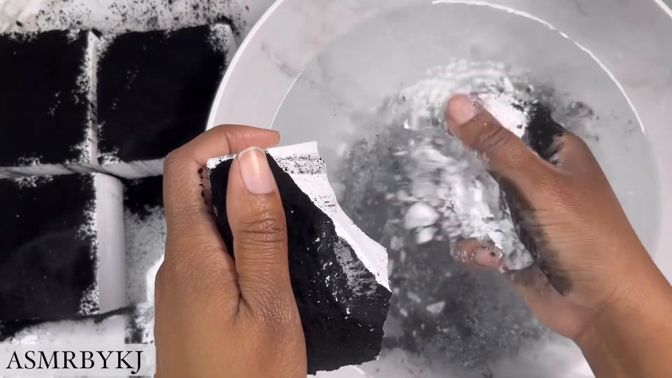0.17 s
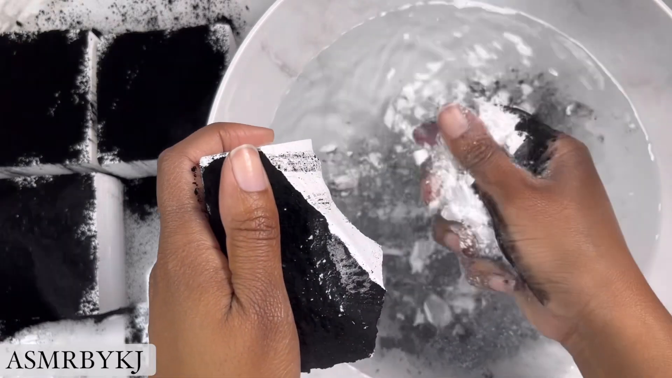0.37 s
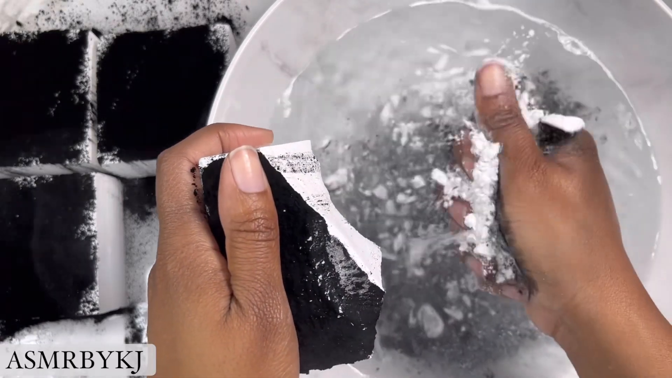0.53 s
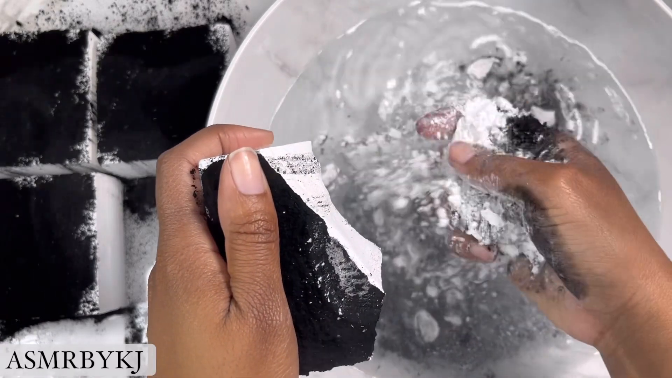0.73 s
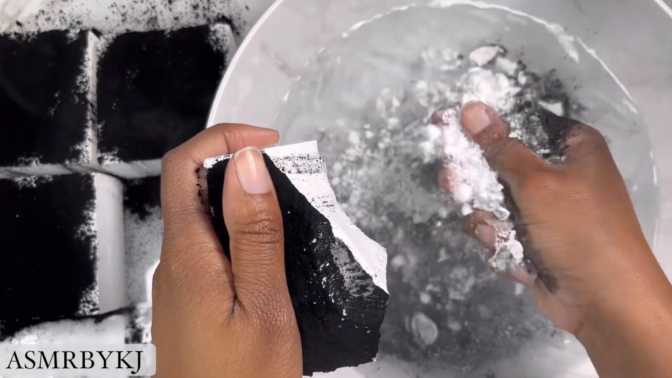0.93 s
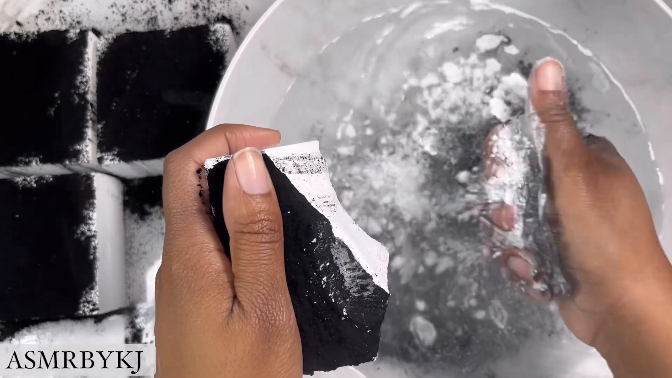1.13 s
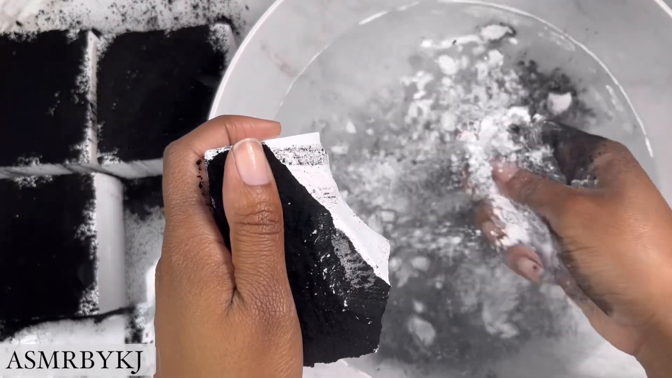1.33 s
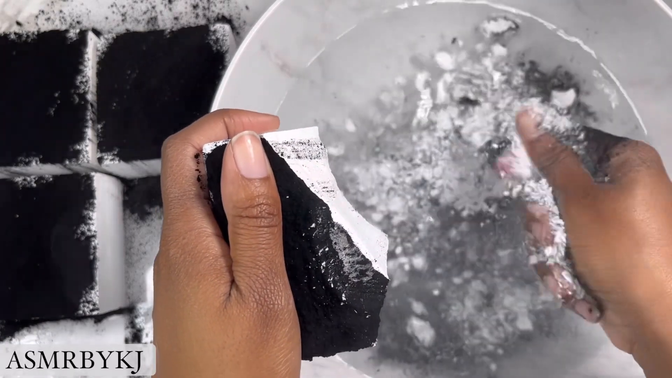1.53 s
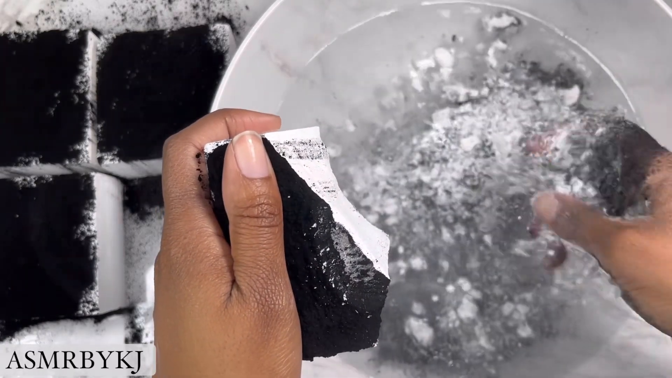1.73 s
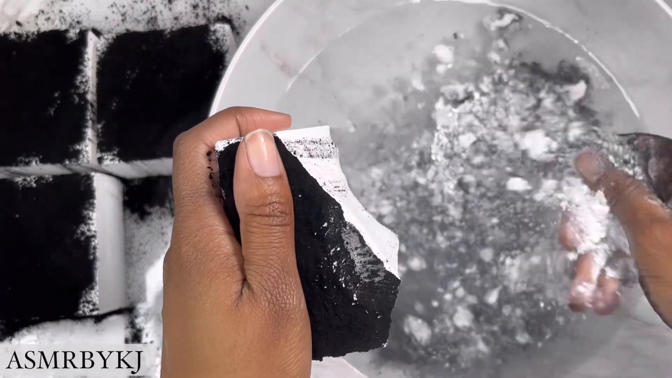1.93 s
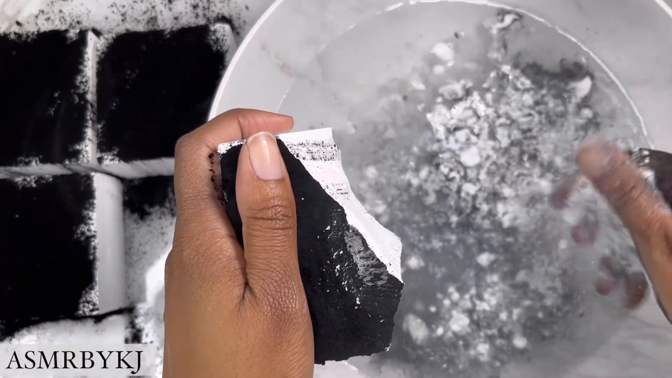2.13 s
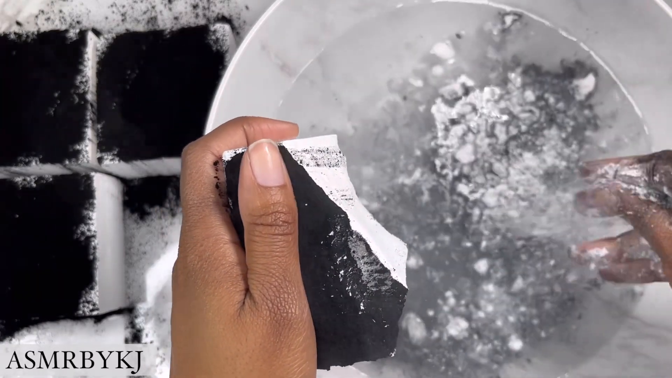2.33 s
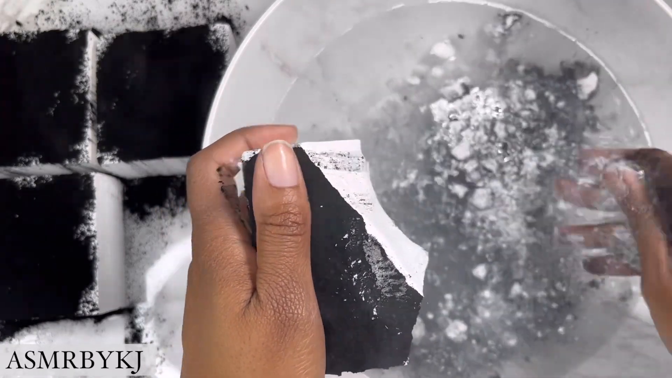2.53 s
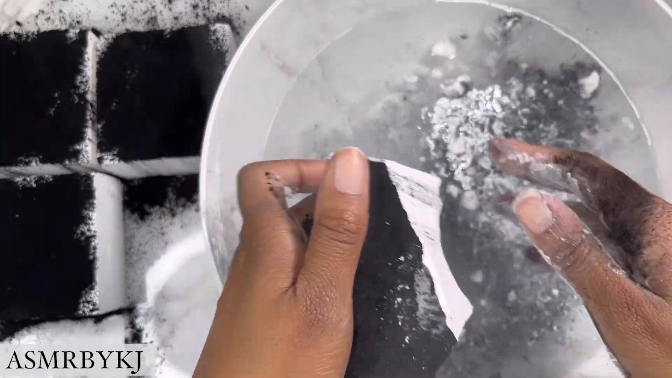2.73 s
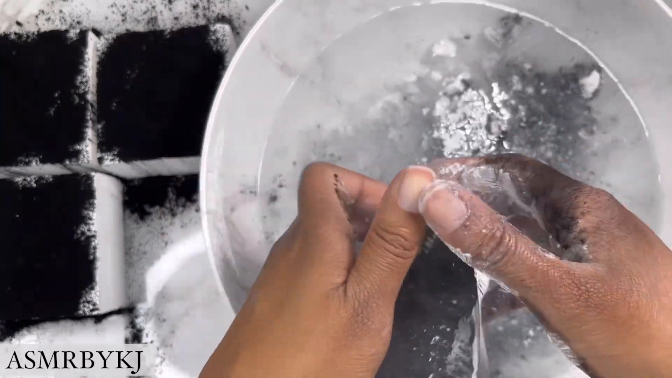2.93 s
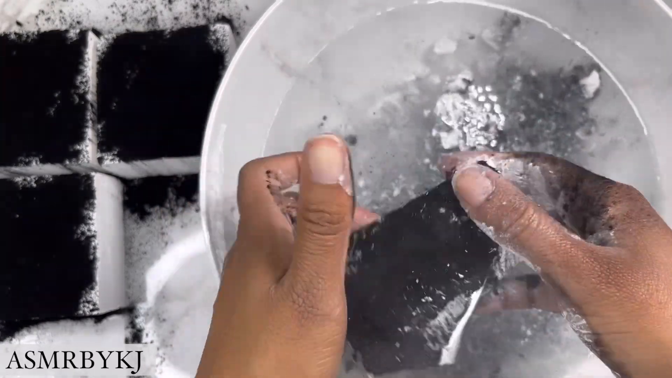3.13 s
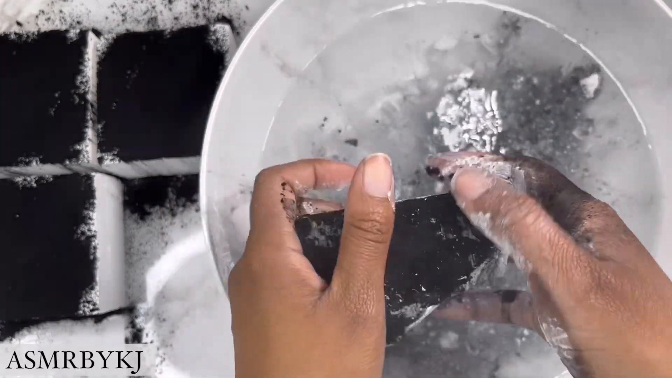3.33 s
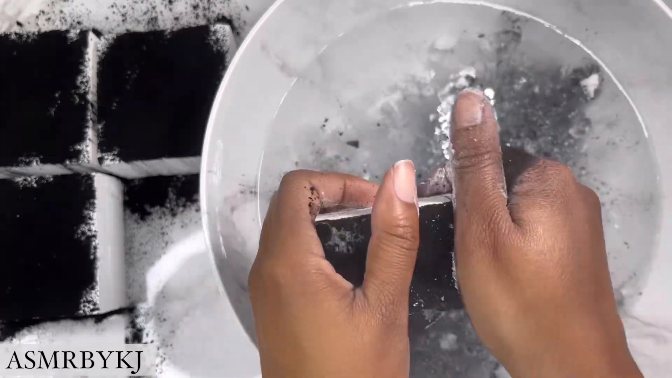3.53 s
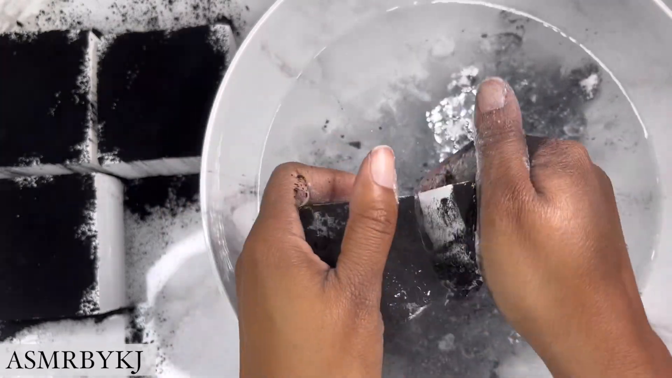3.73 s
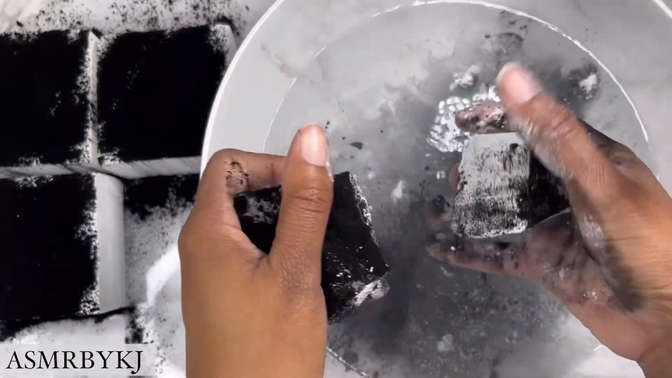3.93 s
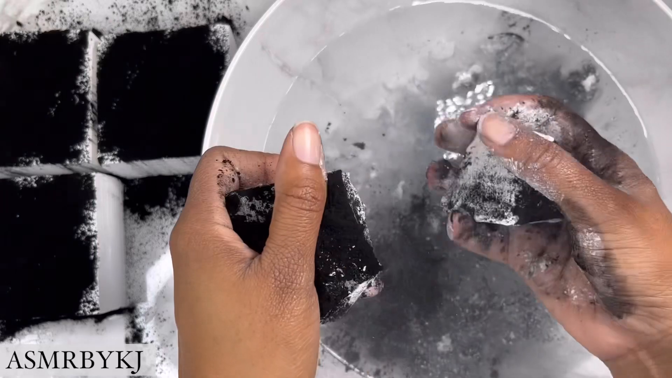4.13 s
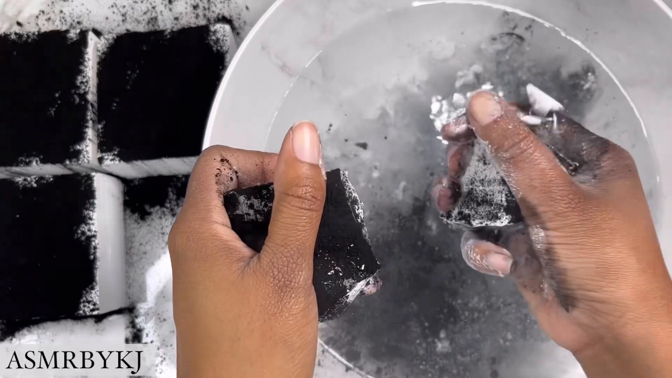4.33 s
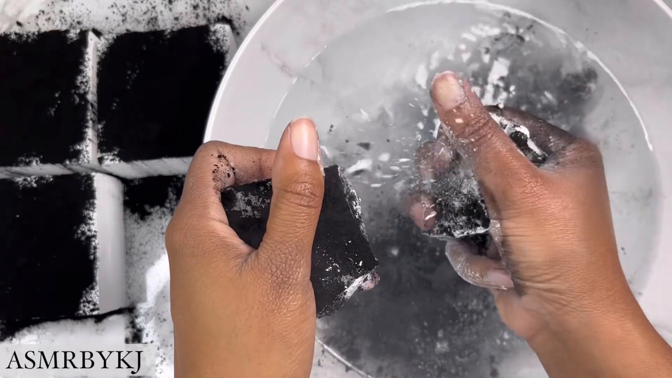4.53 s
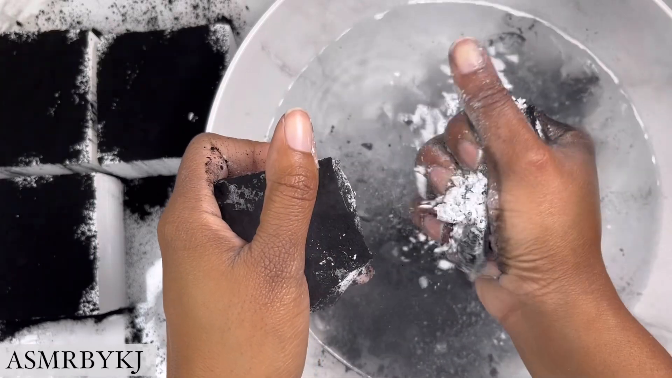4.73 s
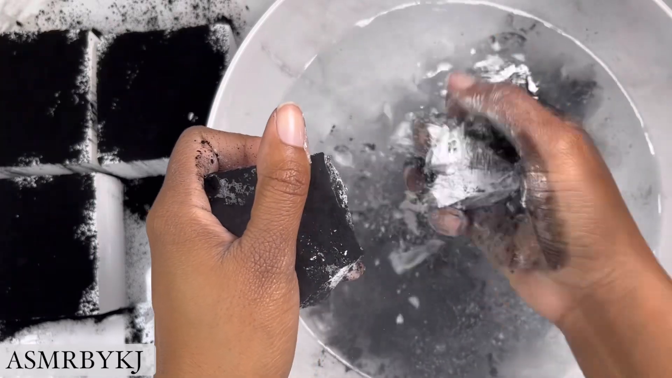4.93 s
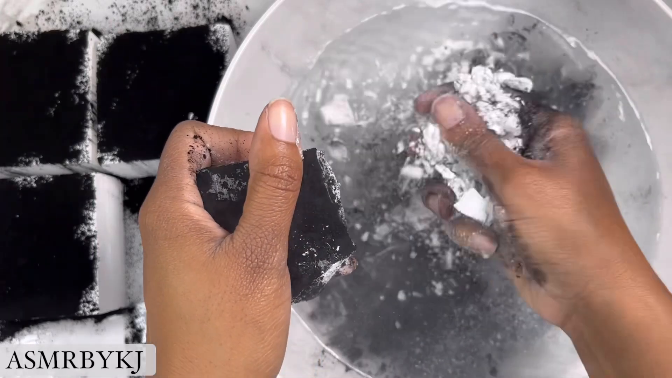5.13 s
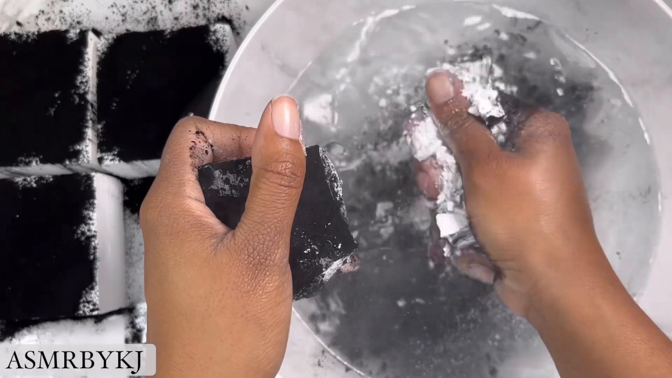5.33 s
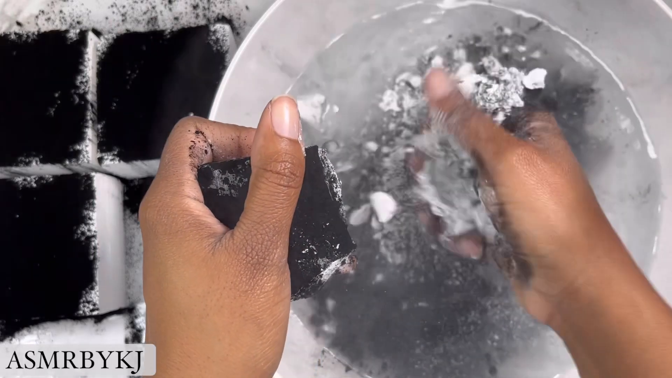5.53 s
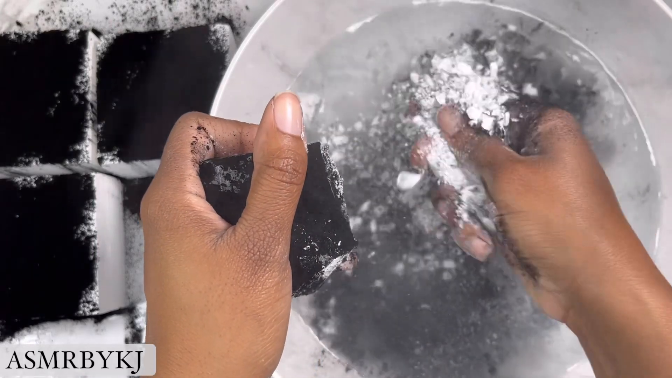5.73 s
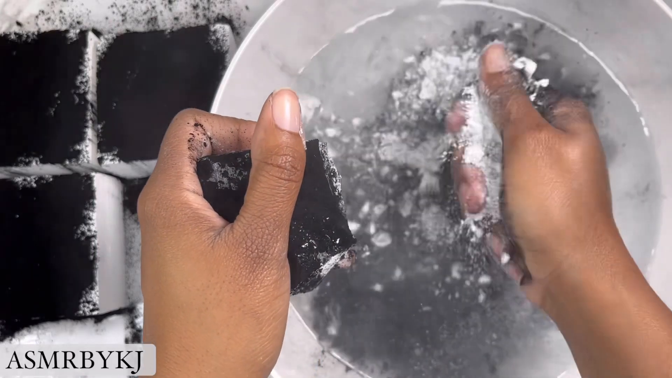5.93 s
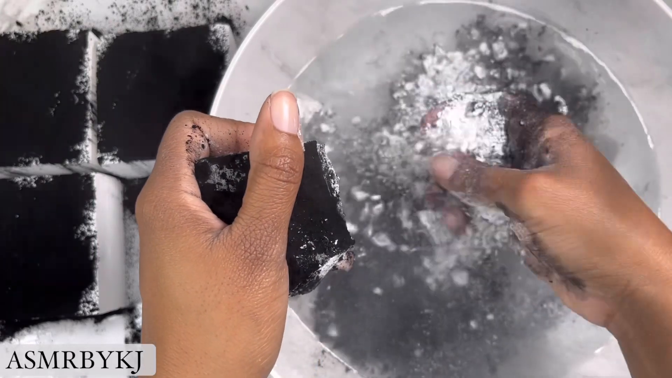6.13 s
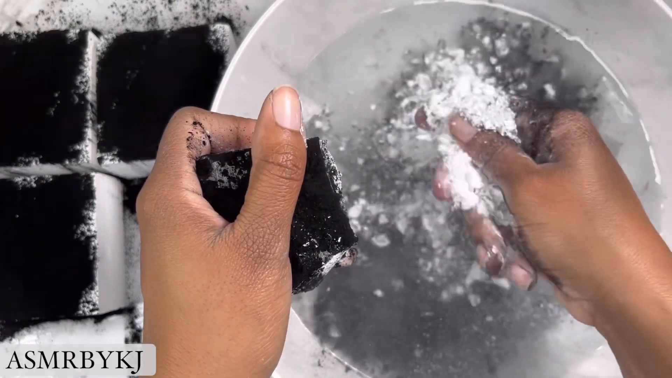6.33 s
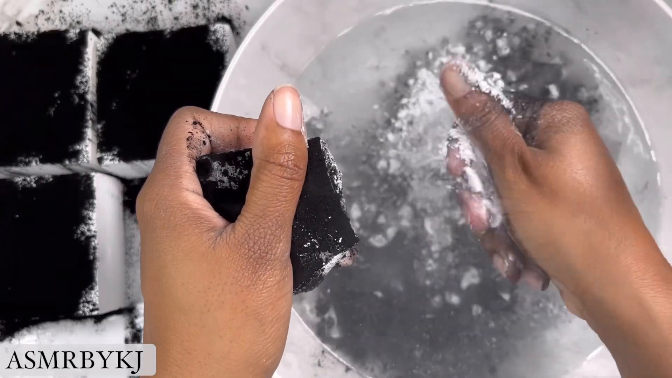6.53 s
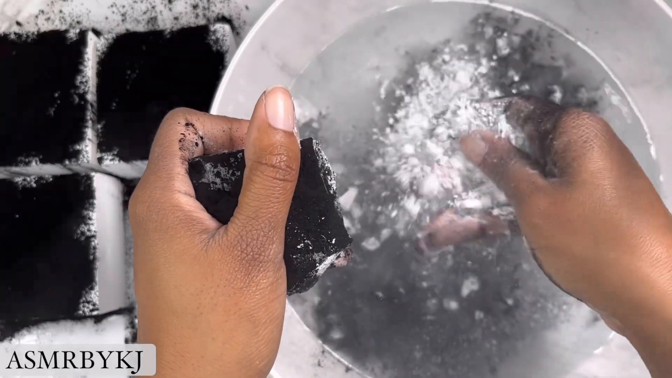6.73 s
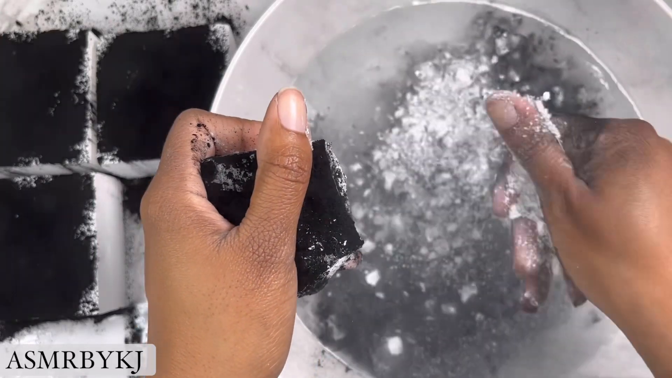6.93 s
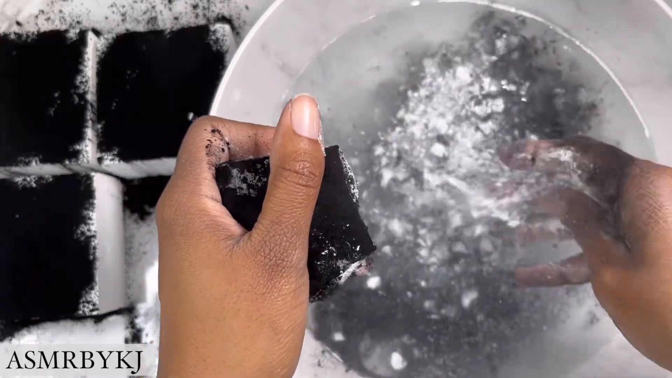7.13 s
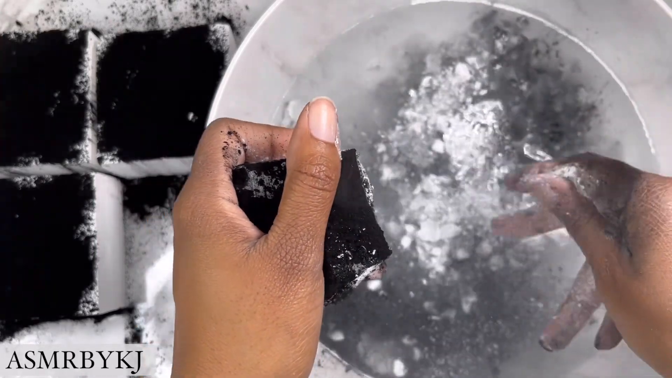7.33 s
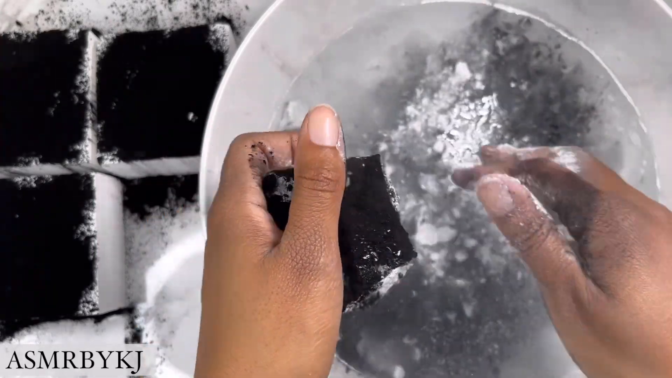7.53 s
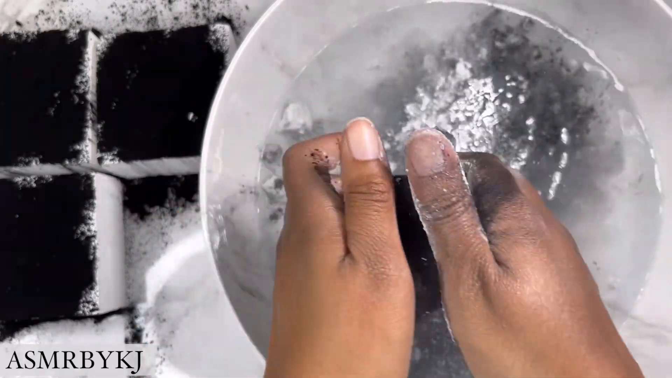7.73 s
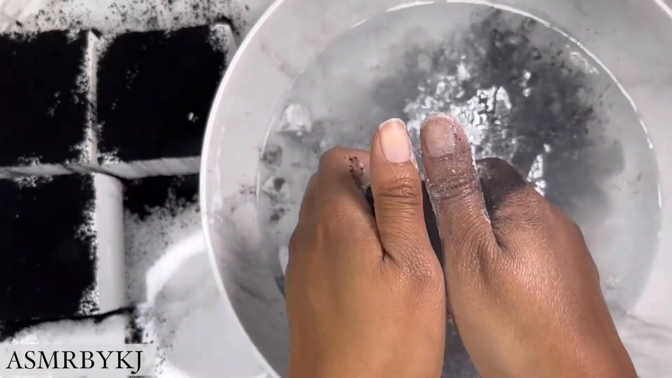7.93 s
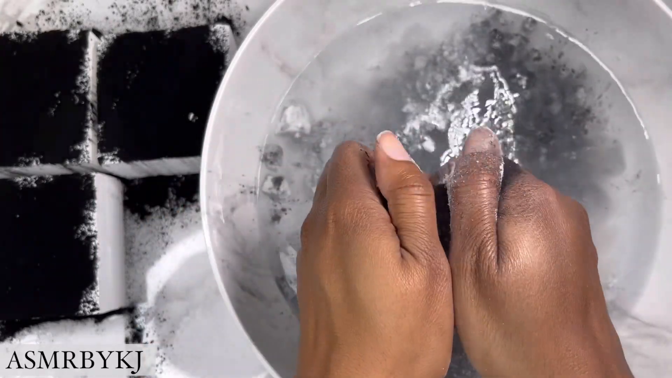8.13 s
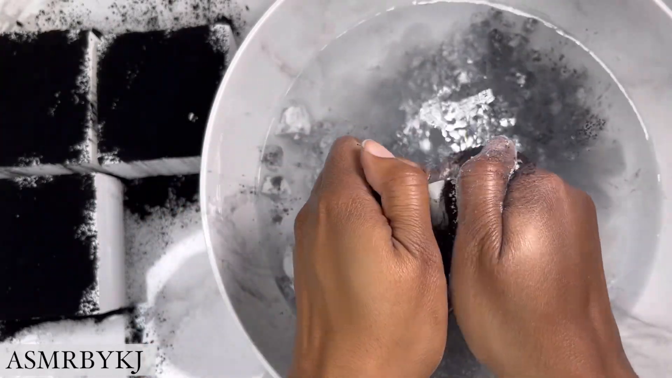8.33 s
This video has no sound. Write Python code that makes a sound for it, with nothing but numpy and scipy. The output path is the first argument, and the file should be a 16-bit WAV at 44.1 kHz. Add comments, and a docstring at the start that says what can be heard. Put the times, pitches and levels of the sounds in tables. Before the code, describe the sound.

Very close to the microphone, fingers crush chalk over a bowl of water with crackling, grinding crumbs and wet fizz. It softens into slippery rubbing, then a block snaps dully. A dense run of loud cracks and crunching follows, thinning to fine crumbling before one last sharp snap. A quiet room rumbles and hums underneath.

```python
"""In a softly rumbling room, hands close to the microphone snap soft chalk and crush it over a bowl of water.
Cracks are short bursts of filtered noise, and two big snaps add a pull and push of air with a dull ring.
Random clicks make grinding crumbs, ticking splinters and fizz; gliding narrow noise makes the squeaks
of air and wet paste. Underneath lie noise for the rumble and wavering tones for a low hum."""
import sys
import numpy as np
from scipy import signal
from scipy.fft import rfft, irfft
from scipy.io import wavfile

SR = 44100
rng = np.random.default_rng(int(sys.argv[2]) if len(sys.argv) > 2 else 0)


def bounce(signal):
    """Save signal as a 16-bit WAV file at the path given by the first command-line argument."""
    frames = np.transpose(np.atleast_2d(signal))
    limited = np.clip(frames, -1, 1)
    pcm = np.round(limited * 32767).astype(np.int16)
    wavfile.write(sys.argv[1], SR, pcm)


N = 369116   # length in samples


def from_db(db):
    """Turn a level in dB into a gain."""
    return 10 ** (np.asarray(db) / 20)


def rms_one(x):
    """Scale a sound so its average strength (rms) is 1."""
    return x / np.sqrt(np.mean(x ** 2) + 1e-20)


def in_time(rows):
    """Draw straight lines between the rows of a table, giving a value for every sample."""
    seconds, *columns = np.transpose(rows)
    return [np.interp(np.arange(N) / SR, seconds, column) for column in columns]


def band(x, low_hz, high_hz):
    """Keep only the pitches between two frequencies."""
    return signal.sosfilt(signal.butter(2, [low_hz, high_hz], "band", fs=SR, output="sos"), x)


def colour(x, spectrum, size=32768):
    """Filter a sound to a spectrum without ringing ahead, by folding the cepstrum (minimum phase)."""
    table_hz, table_db = np.transpose(spectrum)
    hz = np.arange(size // 2 + 1) * SR / size + 1e-3   # the small offset avoids log(0)
    db = np.interp(np.log(hz), np.log(table_hz), table_db)
    cepstrum = irfft(np.log(from_db(db)))
    cepstrum[1:size // 2] *= 2
    cepstrum[size // 2 + 1:] = 0
    impulse = irfft(np.exp(rfft(cepstrum)))
    return signal.fftconvolve(x, impulse)[:len(x)]


def drift(rate_hz):
    """A slow random wander, made by smoothing noise twice; its rms is 1."""
    r = np.exp(-2 * np.pi * rate_hz / SR)
    noise = rng.standard_normal(N + SR)
    return rms_one(signal.lfilter([1], [1, -2 * r, r * r], noise)[SR:])   # drop the first second


def grains(per_s, spread_db):
    """Random clicks of uneven size and either sign."""
    sizes = from_db(spread_db * np.minimum(rng.exponential(1, N), 5)) * rng.choice([-1, 1], N)
    return sizes * (rng.random(N) < per_s / SR)


# The colour of the room rumble. Each row: frequency in Hz, relative noise density in dB per Hz.
RUMBLE_COLOUR = [(2, 5), (14, -0.5), (24, -9.5), (31, -19), (38, -31), (45, -11.5), (85, -26), (100, -28),
                 (190, -32), (340, -39.5), (770, -49.5), (1700, -49.5), (3000, -63)]
RUMBLE_DB = -32.5   # rms level


def rumble():
    """Steady noise, strongest in the deep bass."""
    noise = colour(rng.standard_normal(N + SR), RUMBLE_COLOUR)
    return from_db(RUMBLE_DB) * rms_one(noise[SR:])   # let the filter settle for a second


# The steady low tones. Each row: frequency in Hz, rate of wavering in Hz, level in dB before wavering.
LOW_HUM = [(58.9, 1.9, -49.5), (76.7, 1.34, -48.5)]
# The changing upper tone. Each row: time in seconds, level in dB before wavering.
UPPER_HUM_LEVEL = [(0, -53), (.63, -52), (1.4, -64.5), (2.1, -51.5), (2.8, -65.5), (3.9, -78),
                   (4.45, -62.5), (5.3, -71), (6.2, -62), (6.95, -61.5), (7.6, -51.5), (8.0, -52.5),
                   (8.37, -64)]
UPPER_HUM_HZ, UPPER_HUM_WAVER_HZ = 186.4, 1.2


def hum():
    """Machine tones, each wandering slightly in strength and phase."""
    t, out = np.arange(N) / SR, np.zeros(N)
    upper = (UPPER_HUM_HZ, UPPER_HUM_WAVER_HZ, in_time(UPPER_HUM_LEVEL)[0])
    for hz, waver_hz, db in [*LOW_HUM, upper]:
        waver = 1.25 + .5 * drift(waver_hz) + .5j * drift(waver_hz)
        out += from_db(db) * (waver * np.exp(2j * np.pi * hz * t)).real
    return out


ATTACK_SHARE = 0.81   # gestures rise faster than they fade


def swells(rows):
    """Add up the power of gestures, each swelling and fading as a lopsided bell."""
    t = np.arange(0, N / SR + .002, .002)
    peak_s, length, db = np.transpose(rows)[:, :, None]
    width = length * np.where(t < peak_s, ATTACK_SHARE, 1)
    power = (from_db(db) ** 2 * np.exp(-((t - peak_s) / width) ** 2)).sum(axis=0)
    return np.interp(np.arange(N) / SR, t, power)


# What goes on between gestures; the sounds trim these levels a little.
# Each row: time in seconds, then guiding levels in dB for grinding, fizz and bright rustle.
BETWEEN_GESTURES = [(0, -58, -62, -56), (.12, -60, -49, -45), (.5, -50, -46, -46.5),
                    (1.5, -62, -49.5, -49.5), (1.65, -56.5, -49.5, -51.5), (1.9, -53, -50.5, -50),
                    (2.1, -62.5, -54, -53), (2.7, -65.5, -53.5, -53), (3.25, -71, -53.5, -53.5),
                    (3.75, -63.5, -54, -54.5), (4.2, -66, -63, -51), (4.45, -54.5, -50, -52),
                    (4.82, -59, -53, -50), (5.1, -47, -47, -42.5), (5.47, -54, -49.5, -47.5),
                    (5.75, -46.5, -46.5, -42), (5.97, -59, -54.5, -47), (6.3, -53, -51.5, -47.5),
                    (6.62, -58, -54, -47.5), (7.0, -72, -55, -52), (7.3, -67, -58.5, -53),
                    (7.7, -75, -56.5, -45.5), (7.95, -61, -50.5, -48), (8.1, -65.5, -55.5, -51.5),
                    (8.37, -59, -54, -50)]
# The fist closes on the crumbs.
# Each row: time of the peak in seconds, fading length in seconds, guiding grinding level in dB.
SQUEEZES = [(.098, 0.029, -48), (.31, .12, -46), (.62, 0.054, -46), (.81, 0.14, -49), (1.028, 0.031, -47.5),
            (1.43, 0.15, -49), (1.95, 0.034, -47.5), (2.19, 0.045, -57.5), (2.5, 0.035, -58.5),
            (3.6, 0.046, -53.5), (4.35, 0.036, -47), (4.63, 0.032, -45), (4.725, 0.022, -45.5),
            (4.96, 0.037, -47.5), (5.064, 0.025, -42), (5.21, 0.041, -45), (5.36, 0.027, -45),
            (5.83, 0.07, -47), (6.214, 0.089, -49.5), (6.42, 0.046, -54.5), (6.8, .09, -52),
            (7.17, 0.045, -52.5), (7.367, 0.032, -62), (7.998, 0.024, -61), (8.3, .04, -54)]
SQUEEZE_FIZZ_DB, SQUEEZE_RUSTLE_DB = -4, -2   # air driven out, relative to the squeeze's grinding
# Wet fingers slide over skin and chalk.
# Each row: time of the peak in seconds, fading length in seconds, guiding rustle level in dB.
RUBS = [(1.028, 0.035, -51), (2.393, .025, -44), (2.51, 0.063, -42.5), (2.734, 0.013, -47.5),
        (2.915, 0.076, -46), (3.045, 0.029, -44), (3.169, 0.02, -47.5), (3.277, 0.027, -45.5),
        (3.42, 0.057, -50), (3.8, .05, -53.5), (3.941, 0.019, -46.5), (3.995, 0.011, -44.5),
        (4.053, 0.052, -47), (4.34, 0.07, -46.5), (4.67, 0.096, -43.5), (6.85, 0.038, -47),
        (7.367, 0.028, -48), (7.507, 0.021, -52), (7.69, 0.093, -49)]
RUB_FIZZ_DB = -6.5   # relative to the rub's rustle


def hands():
    """Levels in dB of grinding, fizz and rustle: the power of gestures adds to the steady part."""
    grind, low, bright = from_db(in_time(BETWEEN_GESTURES)) ** 2
    squeeze, rub = swells(SQUEEZES), swells(RUBS)
    grind = grind + squeeze
    low = low + squeeze * from_db(SQUEEZE_FIZZ_DB) ** 2 + rub * from_db(RUB_FIZZ_DB) ** 2
    bright = bright + squeeze * from_db(SQUEEZE_RUSTLE_DB) ** 2 + rub
    return 10 * np.log10([grind, low, bright])


# The colour of grinding crumbs. Each row: frequency in Hz, relative density in dB per Hz.
GRIND_COLOUR = [(120, -41.5), (200, -3.5), (248, -6), (335, -5), (509, -6), (598, -6.5), (680, -29),
                (879, -3), (1130, -14), (1320, -3.5), (1640, -14), (2100, -4), (2600, -37), (3380, -14),
                (5720, -120)]


def grinding(level_db):
    """Crumbs break between the fingers: random clicks in clumps, because their rate wanders."""
    crumbs = grains(1500 * from_db(6.0 * drift(25)), spread_db=3.5)
    return from_db(level_db - 1.0) * rms_one(colour(crumbs, GRIND_COLOUR))


# The colour of bursting bubbles. Each row: frequency in Hz, relative density in dB per Hz.
FIZZ_COLOUR = [(1200, -33), (2000, -11), (2340, -4.5), (3100, 3.5), (3500, 1.5), (4700, 1.5), (5700, -1),
               (9300, 1.5), (12500, 1), (15600, -1.5), (15900, -52)]


def fizz(low_db, high_db):
    """Countless tiny bubbles burst in gusts; patches of pitch also swell and fade on their own."""
    gusts = from_db(1.23 * drift(35))
    # two sets of pops take turns, so neighbouring pitches are unrelated
    pops = [colour(grains(9000, spread_db=0.5), FIZZ_COLOUR) * gusts for _ in range(2)]
    edges_hz = np.geomspace(2000, 18000, 11)
    low_fizz, bright_rustle = np.zeros(N), np.zeros(N)
    for k, (low, high) in enumerate(zip(edges_hz, edges_hz[1:])):
        patch = band(pops[k % 2], low, high) * from_db(1.4 * drift(15))
        if low > 5800:
            bright_rustle += patch
        else:
            low_fizz += patch
    return from_db(low_db - 0.8) * rms_one(low_fizz) + from_db(high_db - 0.27) * rms_one(bright_rustle)


def splinters(level_db):
    """Sparse chips fly off, each ticking for a few cycles at one of 14 pitches."""
    chips, dealt = grains(600, spread_db=4.5), rng.integers(0, 14, N)
    out = np.zeros(N)
    for k, hz in enumerate(np.geomspace(500, 14000, 14)):
        r = from_db(-60 * hz / (9.0 * SR))   # falls by 60 dB in nine cycles
        w = 2 * np.pi * hz / SR
        clicks = chips * (dealt == k) + 1e-18   # the tiny offset avoids slow, vanishing numbers
        ticks = signal.lfilter([1, 0, -1], [1, -2 * r * np.cos(w), r * r], clicks)
        out += ticks * np.sqrt(1 - r)
    return from_db(level_db - 3.5) * rms_one(out)


# Wet squeaks of air and paste between fingers and chalk. Each row: start in seconds, length in seconds,
# first frequency in Hz, last frequency in Hz, rate of flutter in Hz, rms level in dB before the fades.
SQUEAKS = [(.27, 0.039, 4380, 4350, 80, -44.5), (.36, 0.053, 4900, 5100, 100, -47),
           (.42, 0.14, 3150, 3050, 150, -50), (1.0, 0.5, 3100, 2870, 200, -58),
           (1.24, 0.065, 9200, 7400, 400, -52), (1.55, .1, 6200, 4770, 200, -57),
           (1.63, 0.082, 5000, 3590, 250, -47), (1.75, 1, 2870, 2756, 330, -55.5),
           (2.35, 0.23, 1400, 1350, 120, -63.5), (2.22, 0.065, 8500, 8400, 600, -50),
           (2.385, 0.027, 8300, 9200, 300, -36), (2.48, 0.027, 9300, 9500, 500, -45),
           (2.56, 0.046, 7060, 6700, 400, -45), (2.8, 0.22, 4390, 4280, 140, -52.5),
           (3.24, 0.067, 4200, 4250, 100, -50), (3.33, 0.18, 4700, 4660, 300, -54),
           (3.72, 0.16, 4300, 3700, 90, -59), (3.68, 0.42, 4600, 4900, 120, -63),
           (4.02, 0.054, 7000, 6860, 700, -44.5), (4.02, 0.28, 4830, 4600, 200, -57.5),
           (4.05, 0.21, 3880, 3460, 100, -59), (4.62, 0.038, 11400, 11300, 500, -44),
           (4.68, 0.065, 11000, 10800, 400, -43), (5.07, 0.11, 7100, 8440, 700, -44),
           (5.388, 0.0113, 3220, 3150, 250, -34), (5.675, 0.015, 10240, 8300, 300, -32),
           (6.33, 0.076, 8550, 8400, 300, -50.5), (6.68, 0.096, 10600, 10600, 500, -49.5),
           (6.77, 0.058, 5200, 4000, 250, -46), (6.91, 0.056, 10200, 9200, 200, -50),
           (7.43, 0.22, 5960, 7300, 150, -57), (7.7, .35, 3330, 3010, 50, -63),
           (7.95, 0.32, 3080, 2840, 50, -54.5), (8.05, 0.2, 6000, 5700, 60, -64),
           (8.3, 0.032, 5500, 5450, 60, -59)]


def squeak_rows(level_db, count=650):
    """Scatter faint squeaks at random times and pitches, as loud as the fizz at that moment allows."""
    u = rng.random((count, 5))
    start = u[:, 0] * N / SR
    length = 0.0149 + 0.093 * u[:, 2] ** 2
    from_hz = 3000 * 4.5 ** u[:, 1]
    to_hz = from_hz * (.9 + .14 * u[:, 3])
    flutter_hz = np.full(count, 110)
    db = level_db[(start * SR).astype(int)] - 13.5 + 7 * u[:, 4]
    return list(zip(start, length, from_hz, to_hz, flutter_hz, db))


def squeaks(rows):
    """Narrow noise riding on a gliding pitch, swelling and fading."""
    out = np.zeros(N + SR)
    for start, length, from_hz, to_hz, flutter_hz, db in rows:
        n, at = round(length * SR), round(start * SR)
        r = np.exp(-2 * np.pi * flutter_hz / SR)
        noise = rng.standard_normal((2, n + 500))
        flutter = signal.lfilter([1], [1, -2 * r, r * r], noise)[:, 500:]
        turn = 2 * np.pi * np.cumsum(np.geomspace(from_hz, to_hz, n)) / SR
        whistle = rms_one(flutter[0] * np.cos(turn) + flutter[1] * np.sin(turn))
        out[at:at + n] += from_db(db) * signal.windows.tukey(n, .5) * whistle
    return out[:N]


# The clearest cracks. Each row: start in seconds, strength in dB (shifted by SNAP_DB and the part levels),
# body in dB relative to that strength, brittleness in dB, time scale of the burst in milliseconds.
CRACKS = [(.035, -36.5, -28, -6.5, 1.2), (.083, -29, -16, -5, 1.8), (.205, -25.5, -13, -2.5, 1),
          (.308, -24.5, -21, 4.5, 2), (0.327, -20, -31, -3.5, 2.2), (.442, -27, -20, 4.5, 1.1),
          (.534, -21.5, -29, -2.5, .9), (0.632, -27.5, -21, -6.5, 1.5), (.676, -30, -32, 5.5, 0.8),
          (.75, -26.5, -21, 5, 1.5), (1.364, -30, -3.5, -3, 1.2), (1.431, -20, -11, -0.5, 1.2),
          (1.493, -29.5, -6.5, 1, 1.7), (1.67, -28, -22, -0.5, 1.1), (1.683, -31.5, -19, -8, 1.7),
          (1.762, -38.5, -21, -10, 1.3), (1.806, -28, -12, -3.5, 1.9), (1.874, -34, -4, 2, 1.1),
          (1.966, -23.5, -10, -3, 1.6), (2.173, -40.5, -1.5, 0, 1.3), (2.393, -24, -18, 0.5, 1.1),
          (2.563, -25, -36, 11.5, 0.55), (2.572, -39, -13, 3, 1.3), (2.632, -37.5, -14, -5.5, 2.3),
          (3.563, -31, -15, 1, 0.83), (3.579, -28, -28, 2, 2.5), (3.5895, -27, -32, 8, .7),
          (3.596, -12, -17, 2.5, 1.3), (4.275, -14, -16.5, -1, 1.2), (4.309, -8, -22, -2, 0.83),
          (4.333, -1.5, -15.5, 0, 1.35), (4.358, -6, -28, -1, 0.85), (4.375, -20.5, -16, 2.5, .76),
          (4.432, -27, -24, 2.5, 0.73), (4.445, -19.5, -15.5, -4.5, 1.5), (4.492, -21, -36, 0.5, 1.1),
          (4.496, -25, -21, -1, 0.97), (4.541, -35, -19, -6, 1.1), (4.557, -26, -7.5, -10, 1.2),
          (4.567, -12.5, -15.5, 0, 1.9), (4.579, -10, -17, -2, 0.8), (4.734, -23.5, -31, -2, 0.89),
          (4.868, -27, -20, 2, .63), (4.93, -35, -6, 5, 1.4), (4.949, -20.5, -23, 0, 1.6),
          (5.04, -18, -11, -5, 0.63), (5.053, -13, -36, -7.5, 2.3), (5.128, -32.5, -22, -10.5, 1.2),
          (5.182, -22.5, -16, -6, 1.0), (5.204, -24, -12, -6.5, 1.2), (5.218, -22, -38, -4, 1.4),
          (5.275, -30.5, -5, 5, 1.3), (5.296, -18.5, -41, -1.5, 1.2), (5.344, -24, -17, -1, 1.2),
          (5.359, -27, -21, -1, 1.1), (5.387, -32, -33, -10.5, 1.9), (5.511, -29, -25, -6.5, 1.5),
          (5.558, -28, -19, -4, 1.9), (5.574, -25, -20, -4, 1.3), (5.687, -27, -23, 1, 2.6),
          (5.757, -22, -32, 0, 0.92), (5.783, -13, -21, -1.5, 0.82), (5.791, -23, -20, -2, 1.0),
          (5.821, -19.5, -21, -4, 0.56), (5.844, -19, -6, -1, 1.06), (5.884, -20, -15, -4.5, 1.0),
          (6.013, -30, -26, -5, 1.2), (6.1, -33, -14, -8, 1.5), (6.18, -28, -20, -3, 1.9),
          (6.212, -25.5, -12, -5, 2.1), (6.262, -16, -32, -1.5, 1.6), (6.426, -32.5, -12, -5, 3.2),
          (6.729, -29, -16, -9, 1.7), (7.026, -29, -26, 0.5, 1.1), (7.097, -30, -17, 4, 2.1),
          (7.196, -35, -9, -8.5, 1.3), (7.218, -29, -23, 3.5, 2.1), (7.848, -37, -24, 9, 1.0),
          (7.989, -36, -18, -2, 1.0), (8.167, -37.5, -17, -7, 1.5), (8.249, -10.5, -34, -0.5, 0.83)]
# How bowl, table and hands colour a fracture. Each row: frequency in Hz, relative density in dB per Hz.
BOWL_COLOUR = [(59, -42.5), (100, -6), (220, -0.5), (280, -3), (343, -1), (480, 0), (700, -13.5), (860, -5),
               (1350, -10.5), (1700, -9.5), (2600, -5), (3600, 3.5), (5000, -1), (12000, 3.5),
               (16000, -6.5)]
SNAP_DB = 21   # lifts a burst's total energy over its listed strength
MIDDLE_DB, EDGE_DB, TOP_DB = -13, -10, -12   # a plain crack; brittleness moves level from middle to top
EDGE_PER_DB, PLAIN_DB = 0.1758, -23.5   # cracks louder than a plain one gain extra edge
DULL_SHARE = 0.57   # dull cracks also lose edge


def cracks():
    """A noise burst per crack, in four pitch ranges; big pieces give body, brittle ones give top."""
    out, t = np.zeros(N + 4096), np.arange(4096) / SR
    start, strength_db, body_db, brittle_db, ms = np.transpose(CRACKS)[:, :, None]
    life = t * 1000 / np.maximum(ms, .1)
    white = rng.standard_normal(life.shape) * np.sqrt(life) * np.exp(-.8 * life)
    bursts = np.array([colour(row, BOWL_COLOUR, size=2048) for row in white])
    middle_db = MIDDLE_DB - brittle_db
    edge_db = EDGE_DB + EDGE_PER_DB * (strength_db - PLAIN_DB) + DULL_SHARE * np.minimum(brittle_db, 0)
    top_db = TOP_DB + brittle_db
    borders_hz = [100, 700, 2400, 7000, 17000]
    sound = np.zeros(life.shape)
    for low, high, db in zip(borders_hz, borders_hz[1:], (body_db, middle_db, edge_db, top_db)):
        part = band(bursts, low, high)
        part = part / np.linalg.norm(part, axis=1, keepdims=True)   # total energy 1
        sound += from_db(strength_db + db + SNAP_DB) * part
    for at, row in zip(np.round(start[:, 0] * SR).astype(int), sound):
        out[at:at + len(t)] += row
    return out[:N]


# Echoes from nearby surfaces. Each row: low edge in Hz, high edge in Hz,
# time to fall by 60 dB in seconds, relative level in dB.
ECHOES = [(120, 930, 0.11, -5), (1440, 6000, 0.15, -10.5), (4500, 8900, 0.045, -39)]


def surroundings(x):
    """Nearby surfaces return a scatter of noise whose highest treble dies first."""
    t = np.arange(SR // 3) / SR
    scatter = np.zeros(len(t))
    for low_hz, high_hz, t60, db in ECHOES:
        noise = band(rng.standard_normal(len(t)), low_hz, high_hz)
        scatter += from_db(db - 60 * t / t60) * noise / np.sqrt(t60 * SR / 14)
    return signal.fftconvolve(x, scatter * (t > .004))[:N]   # nothing returns in the first 4 ms


# A whole block snaps. Each row: start in seconds, peak level of the blow in dB,
# length of the pull in milliseconds, extra knock in dB for the ringing above 700 Hz.
SNAPS = [(3.5963, -12.5, 1.14, 2.5), (8.2477, -10.5, 1.32, 8.5)]
# The block and the hands around it ring. Each row: frequency in Hz,
# level in dB relative to RING_DB and the blow, time to fall by 60 dB in seconds.
BLOCK_RING = [(142, -15, .09), (213, 4, 0.047), (343, 1.5, 0.071), (400, -22, 0.031), (924, -10, 0.038),
              (1080, -5.5, 0.015), (1350, -9, 0.021), (2030, -11, 0.0099), (2640, 2.5, 0.014),
              (2900, -4, 0.013)]
RING_DB = -8.0   # ringing relative to the blow


def snaps():
    """The block gives way with a pull and a push of air, and rings dully once the pull ends."""
    out, t = np.zeros(N), np.arange(N) / SR
    for start, blow_db, ms, knock_db in SNAPS:
        life = (t - start) * 1000 / ms
        out -= from_db(blow_db) * np.sin(np.pi * life) * (life > 0) * (life < 2)
        since = np.clip(t - start - ms / 1000, 0, 1)
        for hz, db, t60 in BLOCK_RING:
            ring_db = blow_db + RING_DB + db + knock_db * (hz > 700) - 60 * since / t60
            out += from_db(ring_db) * np.sin(2 * np.pi * hz * since)
    return out


def scene():
    """Chalk near the microphone over the room's rumble and hum."""
    grind_db, fizz_db, bright_db = hands()
    breaking = cracks() + snaps() + splinters(grind_db)
    faint_squeaks = squeaks(squeak_rows(np.minimum(fizz_db, bright_db)))
    wet = fizz(fizz_db, bright_db) + squeaks(SQUEAKS) + faint_squeaks
    chalk = breaking + surroundings(breaking) + grinding(grind_db) + wet
    return (chalk + hum() + rumble())[None]


CUTOFF_HZ = 16900   # from here up, at least 60 dB weaker


def record(dry):
    """Clip the loudest peaks just under full scale, then cut the top treble."""
    low_pass = signal.cheby2(14, 60, CUTOFF_HZ, fs=SR, output="sos")
    return signal.sosfilt(low_pass, np.clip(dry, -.97, .97))


dry = scene()
out = record(dry)
bounce(out)
```